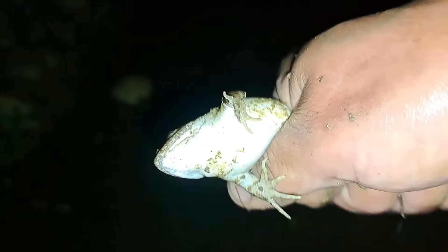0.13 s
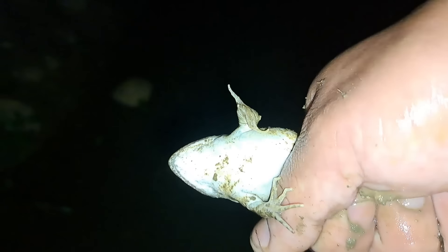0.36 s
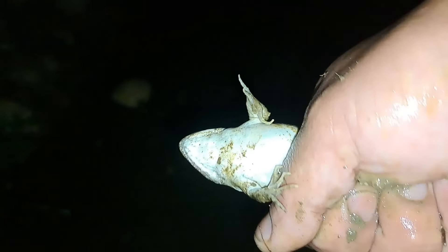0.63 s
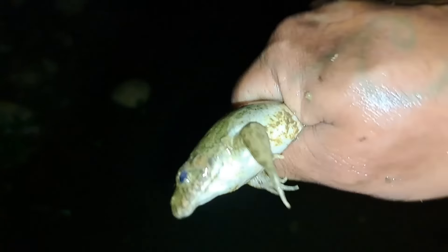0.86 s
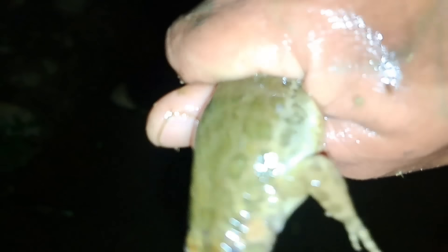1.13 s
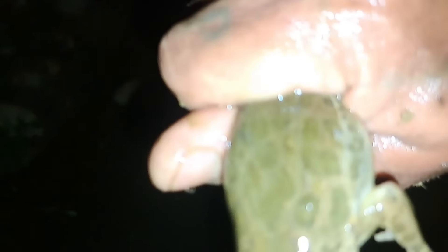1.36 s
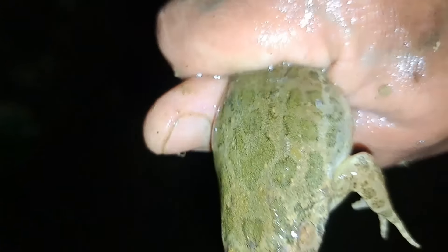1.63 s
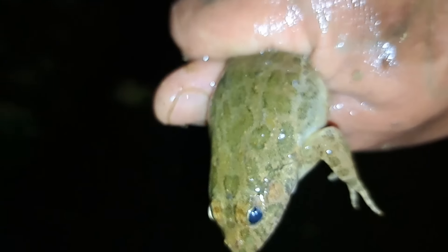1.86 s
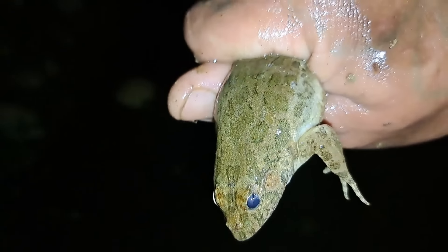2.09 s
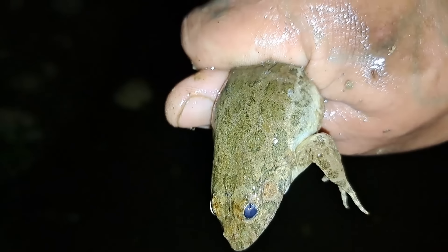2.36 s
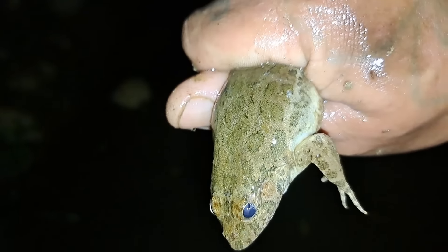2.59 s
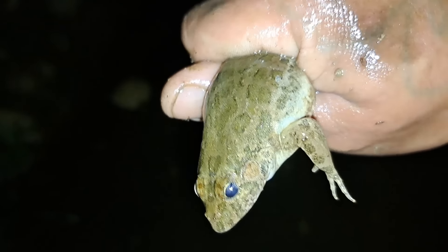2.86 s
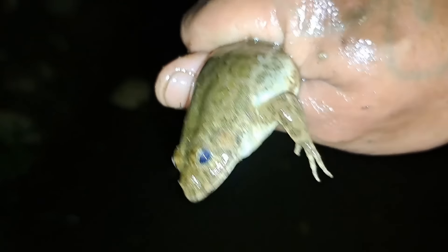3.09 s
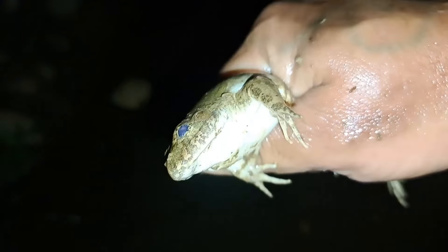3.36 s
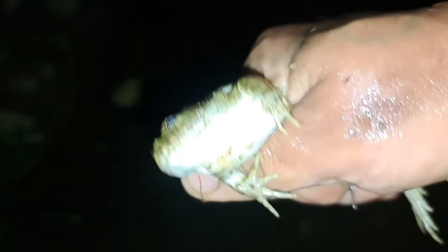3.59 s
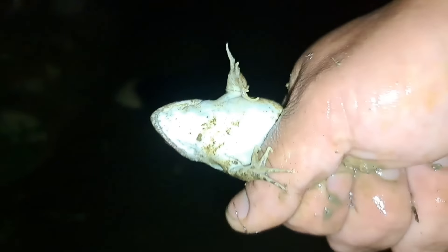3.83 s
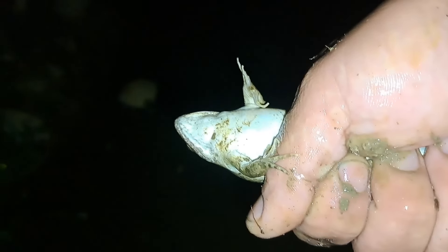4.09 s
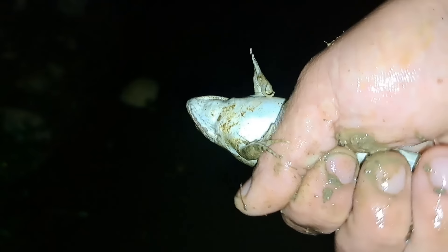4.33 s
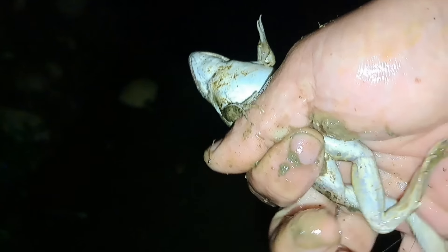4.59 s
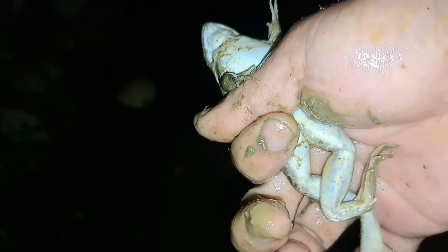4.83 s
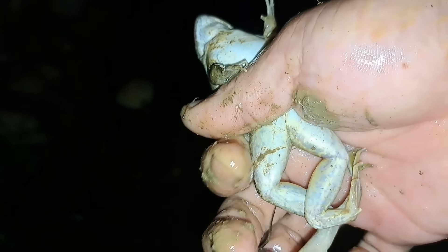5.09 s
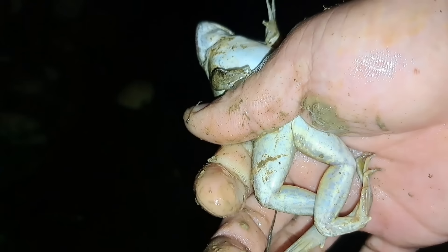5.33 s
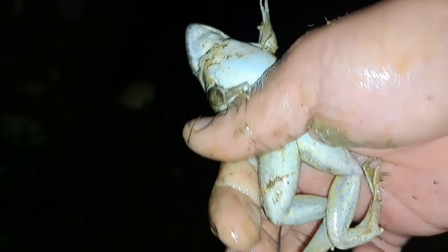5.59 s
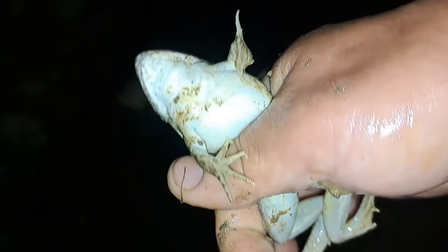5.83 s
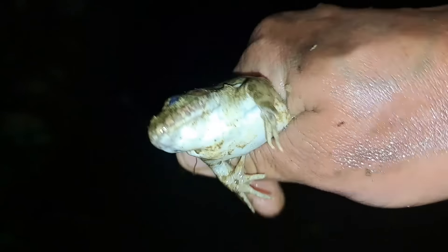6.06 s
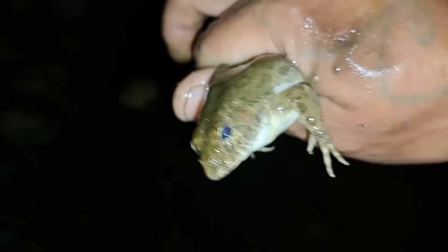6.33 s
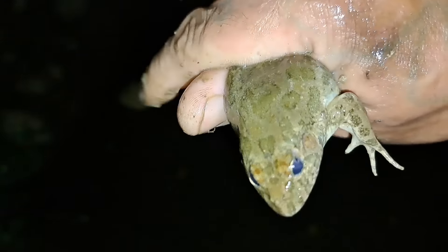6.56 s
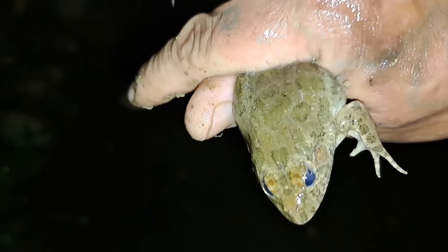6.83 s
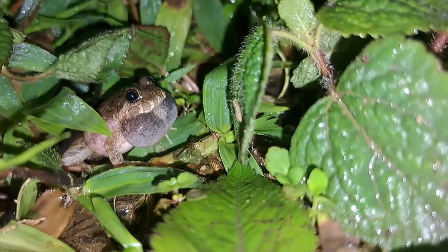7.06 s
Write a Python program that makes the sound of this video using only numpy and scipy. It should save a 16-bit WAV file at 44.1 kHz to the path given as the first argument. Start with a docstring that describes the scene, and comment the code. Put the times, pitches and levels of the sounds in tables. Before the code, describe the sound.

Close stereo microphones in a wet field at night hear a dense, steady insect trill and a hazy distant chorus. Early on a small cricket chirps quickly and frogs peep and cluck; later come wooden rattles and several rasping calls about a third of a second long. High katydid scrapes come and go on the left. The last instant jumps to another spot with hissy air, low wind buffeting on the right and a pulsed frog note near the left.

```python
"""A mole cricket trills from the first moment, steady and to the right, in a flooded field at night.
Each wing stroke starts its ring afresh. Pulses through throat resonances make frog clucks and rattles;
fast pulsed tones make peeps and long buzzing calls. Katydids scrape, a small cricket chirps in short tones,
and throbbing noise bands are the far chorus. Two close ports listen: in the last fifth of a second they hear
another spot, where wind thumps the right port and a near frog calls, while the katydids carry on."""
import sys
import numpy as np
from scipy import signal
from scipy.fft import rfft, irfft, next_fast_len
from scipy.io import wavfile
from scipy.ndimage import uniform_filter1d

SR = 44100
rng = np.random.default_rng(int(sys.argv[2]) if len(sys.argv) > 2 else 0)


def ratio_of_db(decibels):
    """Turn decibels (scalar or array-like) into linear amplitude factors; 0 dB maps to 1."""
    return 10 ** (np.asarray(decibels, float) / 20)


def materialize(psi):
    """Save the field psi as 16-bit PCM at rate SR to the path in sys.argv[1].

    A 1-D psi becomes a single channel; in a 2-D psi each row is a channel.
    """
    bounded = np.clip(np.atleast_2d(psi).T, -1, 1)
    quanta = np.round(bounded * 32767).astype(np.int16)
    wavfile.write(sys.argv[1], SR, quanta)


N = 317079
T = np.arange(N) / SR


def in_time(rows):
    """Second column of a table, joined by straight lines in time."""
    s, value = np.transpose(rows)
    return np.interp(T, s, value)


def drift(rate):
    """Slow chance of spread about 1, rate knots per second; holds still after 800 knots."""
    knots = rng.standard_normal(800)
    return np.interp(T * rate, np.arange(800), knots) * 1.2


def resonate(x, hz, width_hz):
    """Two-pole resonance with gain 1 on top."""
    r = np.exp(-np.pi * width_hz / SR)
    feedback = [1, -2 * r * np.cos(2 * np.pi * hz / SR), r * r]
    return signal.lfilter([(1 - r * r) / 2, 0, (r * r - 1) / 2], feedback, x + 1e-18)


def place(x, pan_db, lag):
    """Two ports: left over right by pan_db; the left hears lag samples earlier (later if negative)."""
    return np.array([np.roll(x, -lag) * ratio_of_db(pan_db / 2), x * ratio_of_db(-pan_db / 2)])


def echoes(x):
    """Faint dull returns from water and banks."""
    dull = signal.lfilter([.5], [1, -.5], x)
    returns = [(.0071, -24), (.0166, -25), (.027, -30)]   # delay_s, level_db
    return x + sum(ratio_of_db(db) * np.roll(dull, round(s * SR), axis=1) for s, db in returns)


def air(table, patchy_db):
    """Unrelated noise in each port, coloured by its spectrum; both waver together a little."""
    hz, *levels_db = np.transpose(table)
    size = next_fast_len(N)
    bins = np.log(np.fft.rfftfreq(size, 1 / SR) + 1)
    colour = [ratio_of_db(np.interp(bins, np.log(hz), db)) for db in levels_db]
    white = rng.standard_normal((2, size)) * np.sqrt(SR / 2)   # 0 dB per Hz
    return irfft(rfft(white) * colour, size)[:, :N] * ratio_of_db(patchy_db * drift(12))


# spectrum of the night air: pitch_hz, left_db_per_hz, right_db_per_hz
NIGHT_AIR = [(39.7, -100, -99), (167, -99, -100), (490, -99, -99), (1010, -99, -87), (1690, -92, -82.5),
             (2680, -71, -74.5), (3420, -89.5, -86.5), (4700, -77.5, -81), (5730, -82.5, -80.5),
             (5670, -86.5, -100), (6860, -88.5, -110), (9000, -91.5, -107), (10200, -95, -114),
             (11600, -96, -105), (14700, -100, -108), (15000, -113, -110)]


def night_air():
    """The field's air as broadband noise."""
    return air(NIGHT_AIR, patchy_db=1.54)


# far singers: pitch_hz, width_hz (of each of two passes), level_db, throbs_per_s, throb_depth (0-1)
FAR_SINGERS = [(1402, 190, -54.5, 3.8, 0.15), (2144, 670, -42, 32, 0.36), (2885, 64, -51.5, 20, 0.86),
               (4166, 460, -47, 35, 0.08), (5153, 240, -52.5, 30, 0.43), (5810, 10, -64, 20, 0.93)]


def chorus():
    """Many far singers blur into noise bands that throb; part of each band is common to both ports."""
    out = np.zeros((2, N))
    for hz, width, db, per_s, depth in FAR_SINGERS:
        shared, own = rng.standard_normal(N), rng.standard_normal((2, N))
        source = place(shared, 0, lag=9) + 0.86 * own
        band = resonate(resonate(source, hz, width), hz, width)
        throb_hz = per_s * (1 + 0.063 * drift(3.4))
        throb = 1 + depth * np.sin(2 * np.pi * np.cumsum(throb_hz) / SR)
        treble = (hz / 6500) ** 6
        side = ratio_of_db([[treble * 1.8], [-treble * 5.5]])   # the treble reaches the left port better
        out += ratio_of_db(db + 1.6 * drift(3.9)) * throb * side * band / band.std()
    return out


# dry ticks: centre_s, level_db (before panning), pitch_hz
DRY_TICKS = [(.07, -44, 13800), (.168, -41, 13800), (.268, -44, 13800), (0.371, -39, 14230),
             (0.491, -43, 13500), (4.221, -18, 4700), (5.165, -41, 12400)]


def ticks():
    """Tiny bursts of noise in one broad ring."""
    out, noise = np.zeros(N), rng.standard_normal(N)
    for s, db, hz in DRY_TICKS:
        width = 0.19 * hz
        burst = noise * np.exp(-((T - s) / 0.00053) ** 2)
        ring = resonate(resonate(burst, hz, width), hz, width)
        out += ratio_of_db(db) * ring * np.sqrt(SR / width / 3)   # makes up for the narrow ring
    return place(out, 12.0, lag=0)


# katydid bouts: first_phrase_end_s, last_phrase_end_s, phrase_s, pitch_hz, level_db (before panning)
KATYDID_BOUTS = [(.19, 6.92, .22, 8223, -61), (.138, .499, 0.23, 9060, -53.5),
                 (.5, 1.17, 0.21, 8630, -56.5), (1.695, 1.695, 0.1, 8850, -63),
                 (1.968, 1.968, .17, 9000, -53), (2.287, 2.955, 0.22, 9040, -52),
                 (4.03, 4.03, .2, 8550, -59), (4.156, 4.156, .07, 8700, -58), (4.457, 4.457, .2, 9000, -53),
                 (4.78, 6.457, 0.24, 9020, -52), (6.7, 6.995, 0.11, 8540, -56.5),
                 (7.18, 7.18, .1, 9000, -75)]


def katydids():
    """Wing notes scraped about 102 a second; phrases come evenly in a bout, swell, climb, then stop."""
    out = np.zeros(N)
    phrase_every_s = .325
    for first, last, length, hz, db in KATYDID_BOUTS:
        ends = np.linspace(first, last, round((last - first) / phrase_every_s) + 1)
        next_end = ends[np.minimum(np.searchsorted(ends, T), len(ends) - 1)]
        to_go = (next_end - T) / length
        inside = (to_go > 0) & (to_go < 1)
        left = (to_go * inside) ** 2
        note_phase = 2 * np.pi * np.cumsum(102 + 1.42 * drift(4.1)) / SR
        notes = np.maximum(np.sin(note_phase) + 0.81, 0)
        roughness = ratio_of_db(0.67 * drift(99))
        scrape_hz = hz - 150 * left + 60 * drift(100)
        scrape = roughness * np.sin(2 * np.pi * np.cumsum(scrape_hz) / SR)
        out += uniform_filter1d(inside * ratio_of_db(db - 4.8 * left), size=200) * notes * scrape
    return place(out, 13.0, lag=-8)


# chirps of the small cricket: first_pulse_s
CHIRP_STARTS = [.245, .43, .575, .745, .91]


def small_cricket():
    """Chirps of four short pure pulses."""
    gap_s, pulse_s = 0.025, 0.0057
    level = sum(np.exp(-((T - s - k * gap_s) / pulse_s) ** 2) for s in CHIRP_STARTS for k in range(4))
    level = ratio_of_db(-41.5 + 1.8 * drift(39)) * level
    tone = np.sin(2 * np.pi * np.cumsum(4380 + 30 * drift(32)) / SR)
    return place(level * tone, 1.5, lag=0)


def buzz(per_s, hz, decay_ms):
    """Pulses that each ring afresh at hz: quick swell, then decay; about rms 1."""
    count = np.cumsum(per_s * (1 + .03 * drift(120))) / SR
    share = count % 1
    since = share / per_s
    strength = ratio_of_db(1.8 * rng.standard_normal(2000))[count.astype(int)]
    swell = since * 1000 / decay_ms
    shape = swell * np.exp(-swell) * (1 - share) ** 0.18   # closes before the next pulse
    return 5.6 * strength * shape * np.sin(2 * np.pi * hz * since)


# far peeps: centre_s, level_db (before panning), half_length_ms
FAR_PEEPS = [(.26, -34.5, 17), (.365, -33, 4.5), (.485, -43, 26), (.53, -38, 8), (.565, -33, 6),
             (0.991, -32.5, 11), (1.095, -34.5, 8.2), (1.215, -36, 6.6), (1.305, -41, 9.3),
             (2.14, -39, 4.3), (3.035, -34.5, 17), (3.069, -39, 9.7), (4.08, -31, 16), (5.19, -35.5, 26),
             (5.261, -36, 7.6), (6.439, -33, 17)]


def peeps():
    """Short swells of pulsed voice, rising in pitch; a loud one opens each long call."""
    level, pitch = np.zeros(N), np.full(N, 2950.)
    top_hz, sag_hz_per_ms = 3111, 14.9   # longer peeps are lower
    openers = [(start - 0.013, db + 8.5, 13) for start, _, db, _ in LONG_CALLS]
    for s, db, half_ms in FAR_PEEPS + openers:
        x = (T - s) * 1000 / half_ms
        level += ratio_of_db(db) * np.exp(-x ** 2)
        pitch = np.where(np.abs(x) < 2, top_hz - sag_hz_per_ms * half_ms + 50 * x, pitch)
    return place(level * buzz(np.full(N, 175.), pitch, 1.4), -3.0, -2)


# long buzzing calls: start_s, end_s, level_db (before effort and panning), first_pulses_per_s
LONG_CALLS = [(3.273, 3.563, -27.5, 213), (4.34, 4.692, -27, 197), (5.363, 5.712, -27, 213),
              (6.058, 6.418, -26.5, 188), (6.879, 7.247, -28.5, 220)]
# effort through a long call: before_end_s, level_db (added to the call's level)
CALL_EFFORT = [(0, -15), (.012, -5.5), (.045, -8), (.08, -9.5), (.12, -5.5), (.14, -4.5), (.27, -2.5),
               (.3, -9), (.36, 0.5)]


def long_calls():
    """A fast pulse train, slowing through the call, rings the vocal sac at two pitches; the upper climbs."""
    upper_top_hz, climb_hz_per_s2 = 3312, 3340   # the upper ring levels off here before its flick
    flick_hz, flick_s = 400, .018
    ring_waver = .008   # share of pitch
    effort, swell = np.zeros(N), np.zeros(N)
    pitch, per_s = np.full(N, 3000.), np.full(N, 190.)
    for start, end, db, first_per_s in LONG_CALLS:
        inside = (T > start) & (T < end)
        to_go, since = end - T[inside], T[inside] - start
        effort[inside] = ratio_of_db(db + np.interp(to_go, *np.transpose(CALL_EFFORT)))
        swell[inside] = 1 - np.exp(-since / 0.0068)   # the lower ring starts softly
        # near the end the pitch flicks up, then drops
        flick = np.sin(np.pi * np.minimum(to_go / flick_s, 2) - np.pi / 2) * (to_go < 1.5 * flick_s)
        pitch[inside] = upper_top_hz - climb_hz_per_s2 * to_go ** 2 + flick_hz * flick
        per_s[inside] = first_per_s - 35 * since
    effort = uniform_filter1d(effort, size=300) * ratio_of_db(1.0 * drift(40))
    upper = effort * buzz(per_s, pitch * (1 + ring_waver * drift(150)), 0.56)
    lower = effort * swell * ratio_of_db(-6) * buzz(per_s, 1597 * (1 + ring_waver * drift(23)), 1.12)
    return place(upper, -3.0, -1) + place(lower, -4.5, -1)


def throat(drive, modes):
    """Parallel resonances, each passed twice: a ring that swells, with dark valleys."""
    out = 0
    for k, (hz, width, db) in enumerate(modes):
        ring = resonate(resonate(drive, hz, width), hz, width)
        out = out + (-1) ** k * ratio_of_db(db) * ring   # alternating signs carve the valleys
    return out


# rattles: first_knock_s, last_knock_s, level_db (before each knock's swell, fade, chance and panning)
RATTLE_RUNS = [(1.295, 1.392, -21.5), (2.596, 2.78, -21), (4.2253, 4.409, -19), (5.0614, 5.2578, -18.5),
               (6.043, 6.2485, -18.5), (6.8191, 7, -17.5)]
# throat of the rattling frog: pitch_hz, width_hz (of each pass), level_db (relative)
RATTLE_MODES = [(944, 570, -19), (1307, 212, -3.5), (1570, 330, -3.5), (2230, 500, -2.5),
                (3320, 660, -13.5)]


def rattle():
    """Slow knocks of the vocal folds that swell, fade and hurry a little; each has a weak after-beat."""
    drive = np.zeros(N)
    gap_s, hurry = .023, 0.0691
    for (first, last, db), chance in zip(RATTLE_RUNS, rng.standard_normal((len(RATTLE_RUNS), 12))):
        k = np.arange(round((last - first) / gap_s) + 1)
        share = k / k[-1]
        s = first + (last - first) * (share + hurry * share * (1 - share))
        rise_db, fade_db = 3 * np.maximum(1.5 - k, 0), 1.2 * np.maximum(k - 1.5, 0)
        level = ratio_of_db(db - rise_db - fade_db + 1.0 * chance[k])
        drive[(s * SR).astype(int)] = level
        drive[((s + .0048) * SR).astype(int)] = level * ratio_of_db(-11.0)   # after-beat
    one_knock = throat(signal.unit_impulse(1000), RATTLE_MODES)
    return place(throat(drive, RATTLE_MODES) / np.abs(one_knock).max(), -5.0, -4)


def clucks(table, modes, gap_ms, peak_ms, rise_db, fade_db, lead):
    """Runs of uneven, slowing vocal pulses, swelling to peak_ms then fading (dB per ms), ring a throat."""
    out = np.zeros((2, N))
    for (s, db, pan_db), chance in zip(table, rng.standard_normal((len(table), 40))):
        drive, k = np.zeros(N), np.arange(20)
        ms = (k + 0.12 * chance[:20] * (k > 0)) * gap_ms * (1 + 0.023 * k)   # slowing
        uneven_db = 1.8 * chance[20:]
        course_db = -rise_db * np.maximum(peak_ms - ms, 0) - fade_db * np.maximum(ms - peak_ms, 0)
        drive[((s + ms / 1000) * SR).astype(int)] = ratio_of_db(course_db + uneven_db)
        soft = signal.lfilter(np.hanning(7) / 3, [1], drive)   # a pulse takes a moment
        ring = throat(soft, modes)
        out += place(ratio_of_db(db) * ring / np.abs(ring).max(), pan_db, lead)
    return out


# low clucks: start_s, peak_db (before panning), left_over_right_db
LOW_CLUCK_RUNS = [(.4635, -9, -1), (2.435, -10, -1), (5.0785, -10, -2)]
# their throat: pitch_hz, width_hz (of each pass), level_db (relative)
LOW_MODES = [(503, 110, -9), (730, 124, 1.5), (1270, 510, 3.5), (1575, 130, 4.5), (2340, 230, 5),
             (3100, 340, -8.5), (4000, 1100, -17)]


def low_clucks():
    """Widely spaced pulses ring a low throat."""
    return clucks(LOW_CLUCK_RUNS, LOW_MODES, gap_ms=3.0, peak_ms=0.37, rise_db=0.3, fade_db=0.98, lead=2)


# high clucks: start_s, peak_db (before panning), left_over_right_db
HIGH_CLUCK_RUNS = [(1.4215, -5.5, -4), (3.366, -4.5, -3), (5.8318, -4.5, -5)]
# their throat: pitch_hz, width_hz (of each pass), level_db (relative)
HIGH_MODES = [(598, 79, 1.5), (710, 100, -1.5), (1087, 800, 0), (1680, 1600, 2.5), (2007, 260, 16),
              (3220, 150, -3), (4290, 800, 0.5)]


def high_clucks():
    """Closely spaced pulses ring a brighter throat."""
    return clucks(HIGH_CLUCK_RUNS, HIGH_MODES, gap_ms=0.94, peak_ms=1.5, rise_db=1.9, fade_db=1.67, lead=4)


# air at the second spot: pitch_hz, left_db_per_hz, right_db_per_hz
SECOND_AIR = [(25.2, -98, -94), (53, -112, -33.5), (168, -120, -68), (346, -100, -72), (800, -82, -81),
              (1810, -72, -89), (3540, -81.5, -107), (4440, -64.5, -105), (4330, -80, -109),
              (5300, -73, -109), (5860, -88, -117), (7200, -83, -117), (11100, -84.5, -116),
              (12300, -80.5, -107), (14200, -85, -108), (15400, -96, -110)]


def second_air():
    """Wind rumbles in the right port while the left hears hiss."""
    return air(SECOND_AIR, patchy_db=1.9)


# wind thumps on the right port: centre_s, level_db, width_ms
WIND_THUMPS = [(7.064, -10.5, 0.96), (7.095, -9.5, 1.05), (7.184, -13.5, 0.87)]


def wind_thumps():
    """Single swings of pressure in the right port: suction, then a slower rebound."""
    out = np.zeros((2, N))
    for s, db, width_ms in WIND_THUMPS:
        x = (T - s) * 1000 / width_ms
        rebound = 0.21 * np.exp(-(x - 2.2) ** 2 / 2)
        out[1] -= ratio_of_db(db) * (np.exp(-x ** 2) - rebound)
    return out


# pulses of the near frog: start_s, left_level_db, decay_ms
NEAR_PULSES = [(7.071, -21.5, 6.6), (7.116, -29, 2), (7.151, -22.5, 5.8), (7.162, -15.5, 2.8),
               (7.182, -12.5, 3.6)]


def near_frog():
    """Pulsed tone with an octave overtone, close to the left port."""
    out = np.zeros((2, N))
    for s, db, decay_ms in NEAR_PULSES:
        ms = np.maximum(T - s, 0) * 1000
        shape = (1 - np.exp(-ms / 1.6)) * np.exp(-(ms / decay_ms) ** 1.8)
        phase = 2 * np.pi * 1425 * ms / 1000
        tone = np.sin(phase) + 0.28 * np.sin(2 * phase)
        out += ratio_of_db([[db], [db - 33]]) * shape / shape.max() * tone
    return out


# wing speed: time_s, strokes_per_s
WING_SPEED = [(0, 74.38), (.61, 74.18), (.82, 75.5), (1.19, 74.79), (1.75, 75.6), (1.96, 73.76),
              (2.32, 74.89), (3.23, 76.3), (3.54, 74.89), (3.76, 75.77), (3.97, 75.39), (4.73, 74.88),
              (4.94, 74.18), (5.5, 75.66), (5.71, 74.36), (6.33, 75.21), (6.54, 74.61), (7, 74.17)]
# loudness, mean of both ports: time_s, rms_db
TRILL_LOUDNESS = [(0.03, -29), (0.38, -25.5), (0.88, -26.5), (0.99, -27.5), (3.15, -29), (4.48, -26.5),
                  (4.6, -28), (5.81, -27), (6.0, -30), (6.37, -28), (6.89, -29), (6.95, -27.5)]
# overtones of the stroke: pitch_multiple, left_db, right_db (both relative to the fundamental)
STROKE_OVERTONES = [(3, -27.5, -73), (4, -34.5, -61)]


def mole_cricket():
    """Each wing stroke starts the ring afresh, sliding up to pitch; strokes differ a little."""
    trill_hz, peak = 2424, 0.235   # peak and the widths below are shares of a stroke
    count = 1.55 + np.cumsum(in_time(WING_SPEED)) / SR
    stroke, share = count.astype(int), count % 1
    chance = rng.standard_normal((600, 3))[stroke]
    since = T - np.interp(stroke, count, T)
    slide = .35 * np.exp(-since / .001)   # cycles still to make up
    cycles = trill_hz * (1 + .003 * chance[:, 0]) * since + slide
    phase = 2 * np.pi * cycles + .75 * chance[:, 1] + .6 * drift(5)
    settled = np.clip(share / .2, 0, 1) ** 2   # overtones grow once the ring is at pitch
    opening_db = 10 * (np.maximum(peak - share, 0) / .13) ** 2
    # the left port hears less, but more of the snap at the stroke's peak
    left_db = -7.5 + 4 * np.exp(-((share - peak) / 0.031) ** 2)
    out = np.zeros((2, N))
    for port, (port_db, die_share) in enumerate([(left_db, 0.26), (0, .28)]):
        overtones = sum(ratio_of_db(row[1 + port]) * np.sin(row[0] * phase) for row in STROKE_OVERTONES)
        tone = np.sin(phase) + settled * overtones
        dying_db = 10 * (np.maximum(share - peak, 0) / die_share) ** 3.08   # 10 dB down at die_share
        out[port] = ratio_of_db(port_db - opening_db - dying_db + 0.68 * chance[:, 2]) * tone
    out[0] = np.roll(out[0], -12)   # the left port hears 12 samples earlier
    return ratio_of_db(in_time(TRILL_LOUDNESS)) * out / out.mean(axis=0).std()


def scene():
    """The first spot gives way at once to the second, which fades in; katydids sing through both."""
    knocks = low_clucks() + high_clucks() + rattle()
    left_bass_cut = signal.butter(2, 820, "high", fs=SR, output="sos")   # the left port passes little bass
    knocks = np.array([signal.sosfilt(left_bass_cut, knocks[0]), knocks[1]])
    thin = signal.butter(4, 1150, "high", fs=SR, output="sos")   # small bodies radiate no bass
    singers = signal.sosfilt(thin, mole_cricket() + long_calls() + peeps() + small_cricket())
    field = echoes(knocks + singers) + ticks() + chorus() + night_air()
    second_spot = second_air() + wind_thumps() + near_frog()
    move_s = 7.004
    leave = np.clip((move_s - T) / 0.00057, 0, 1)
    arrive = np.clip((T - move_s) / 0.018, 0, 1)
    return field * leave + second_spot * arrive + katydids()


def top_cut(x):
    """Nothing passes above the cut-off."""
    return signal.sosfilt(signal.butter(12, 15620, fs=SR, output="sos"), x)


def record(dry):
    """Peaks of the mix stop at full scale."""
    mix = np.clip(dry, -1, 1)
    return top_cut(mix)


dry = scene()
out = record(dry)
materialize(out)
```